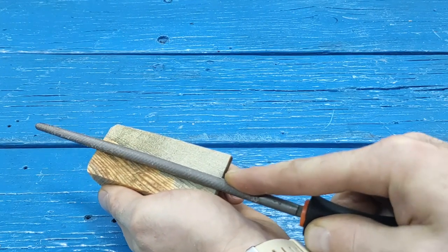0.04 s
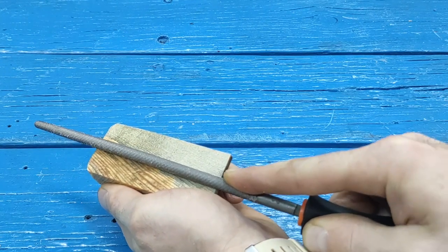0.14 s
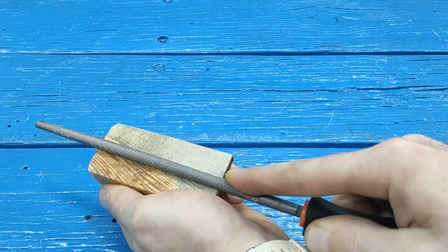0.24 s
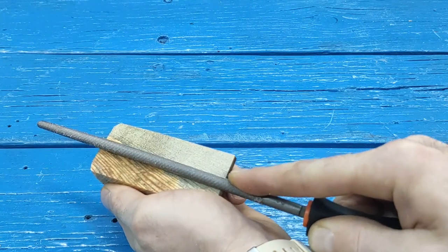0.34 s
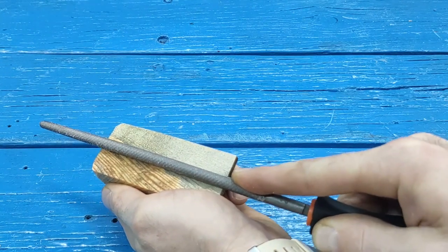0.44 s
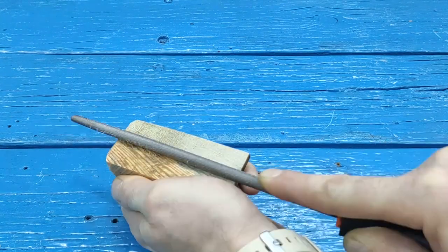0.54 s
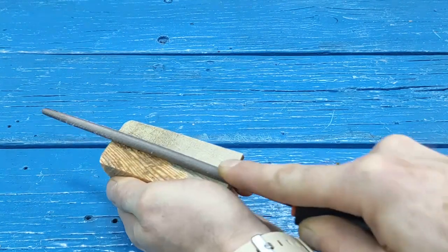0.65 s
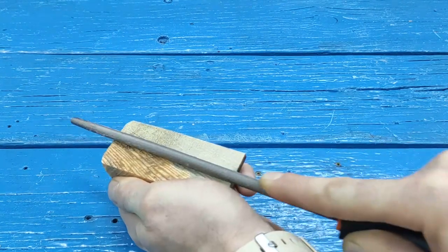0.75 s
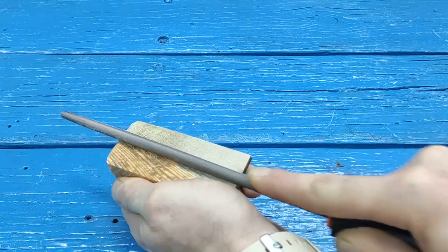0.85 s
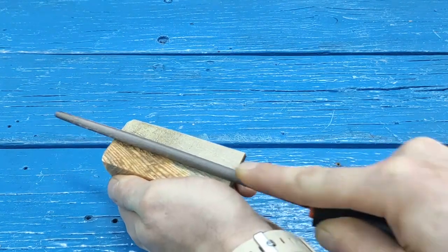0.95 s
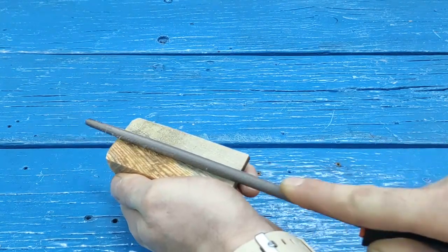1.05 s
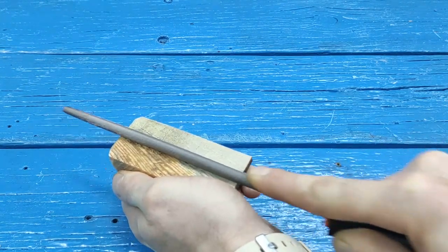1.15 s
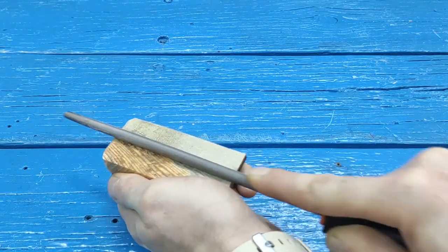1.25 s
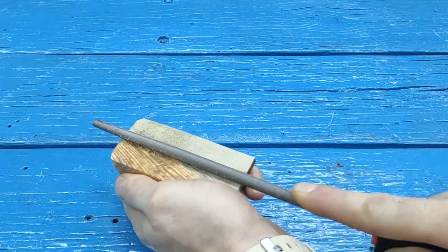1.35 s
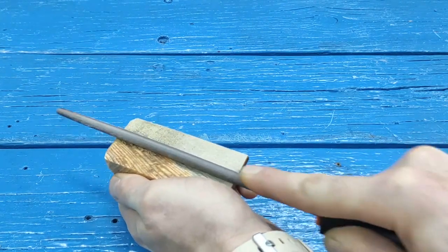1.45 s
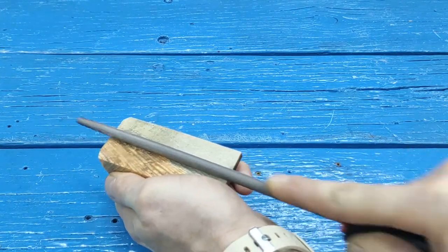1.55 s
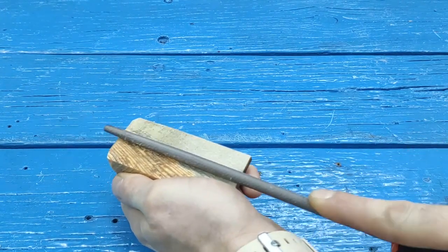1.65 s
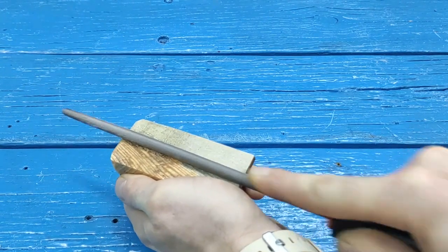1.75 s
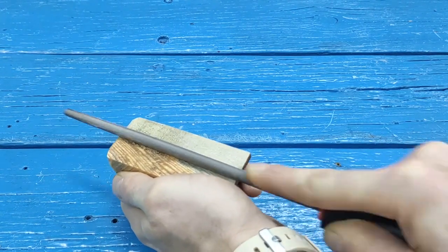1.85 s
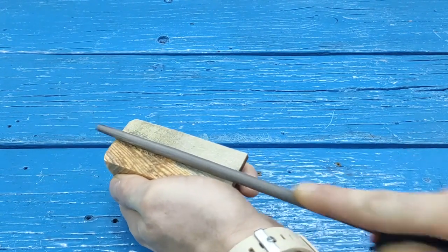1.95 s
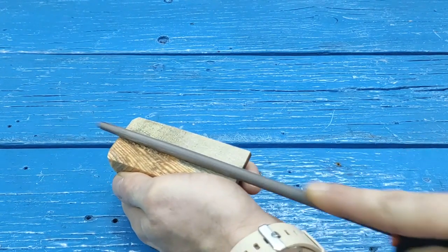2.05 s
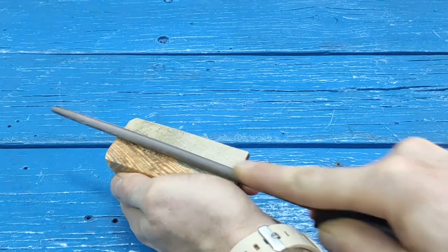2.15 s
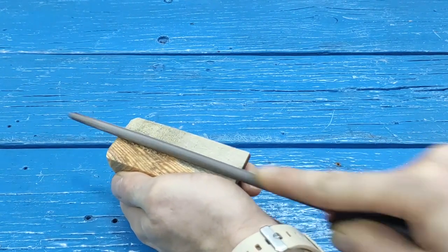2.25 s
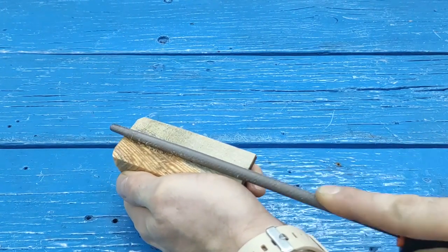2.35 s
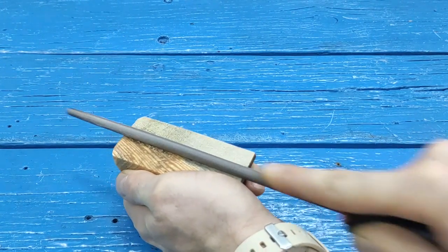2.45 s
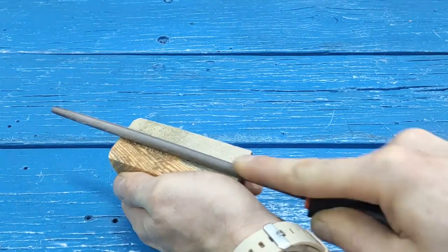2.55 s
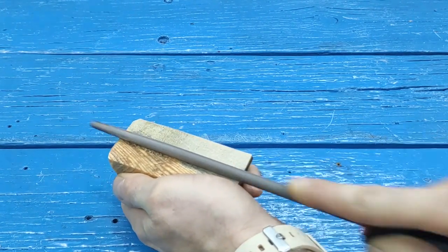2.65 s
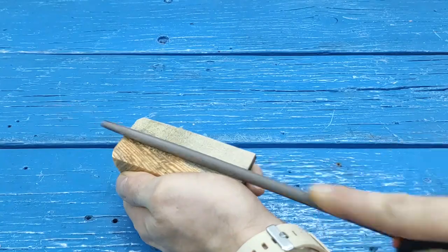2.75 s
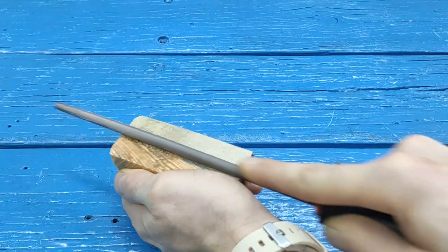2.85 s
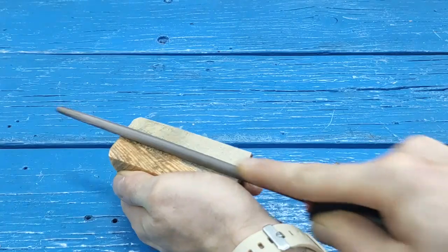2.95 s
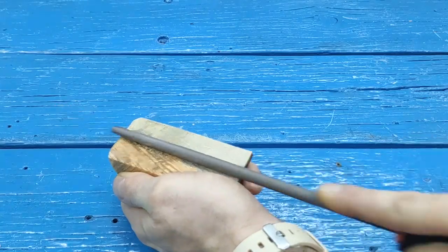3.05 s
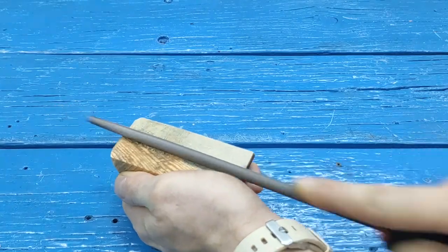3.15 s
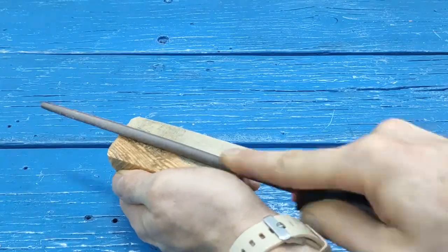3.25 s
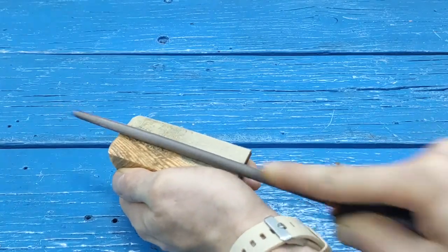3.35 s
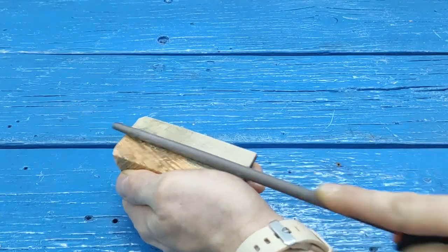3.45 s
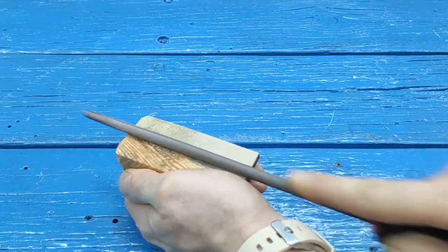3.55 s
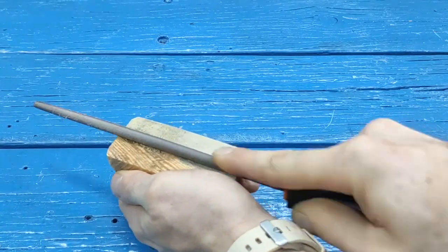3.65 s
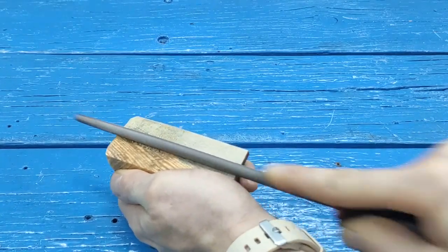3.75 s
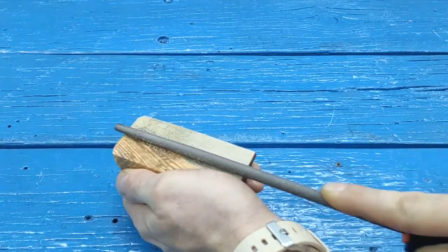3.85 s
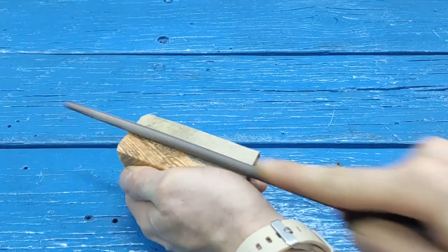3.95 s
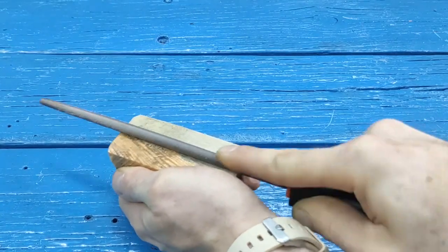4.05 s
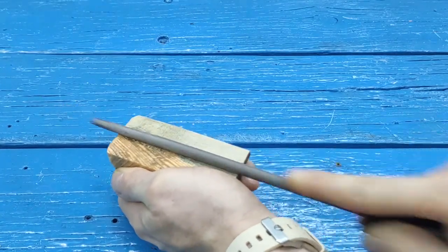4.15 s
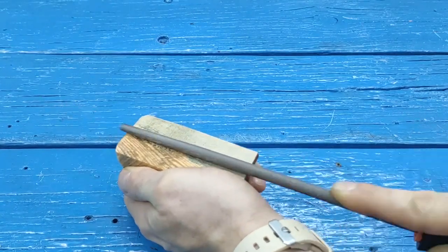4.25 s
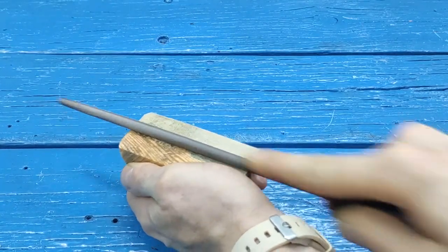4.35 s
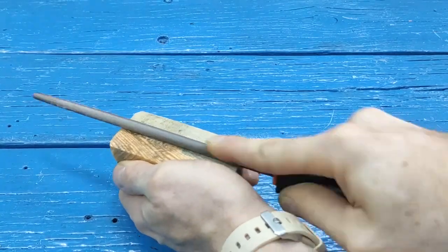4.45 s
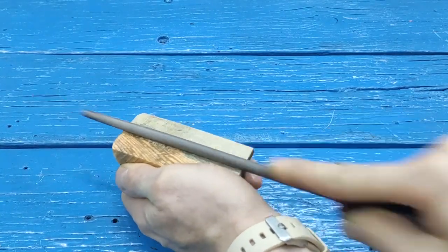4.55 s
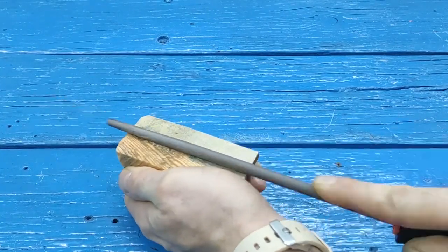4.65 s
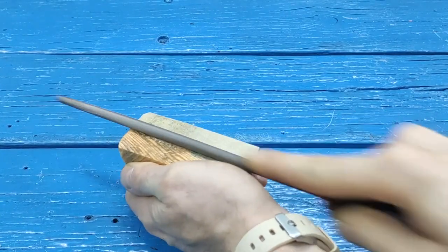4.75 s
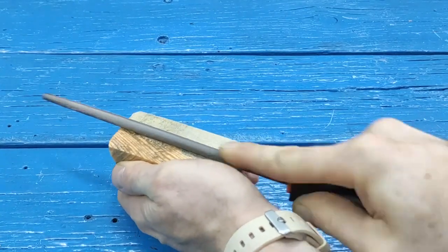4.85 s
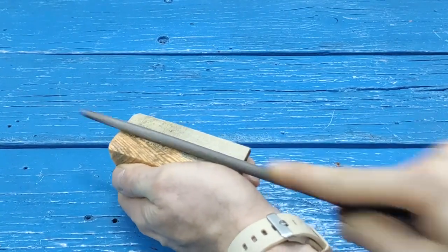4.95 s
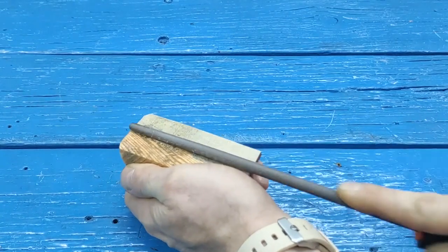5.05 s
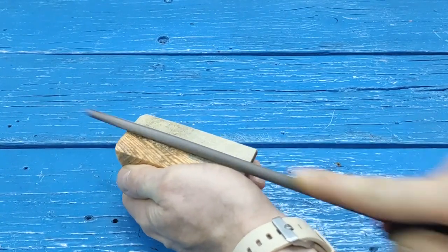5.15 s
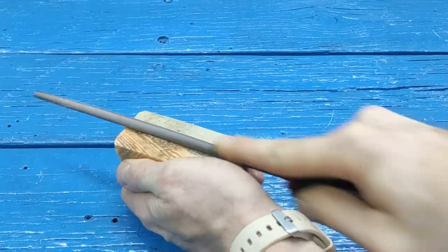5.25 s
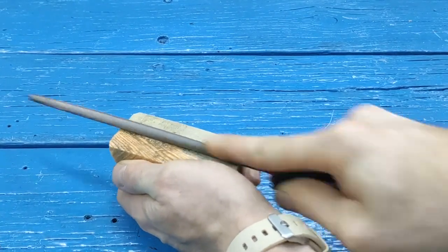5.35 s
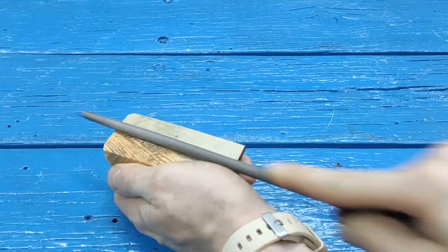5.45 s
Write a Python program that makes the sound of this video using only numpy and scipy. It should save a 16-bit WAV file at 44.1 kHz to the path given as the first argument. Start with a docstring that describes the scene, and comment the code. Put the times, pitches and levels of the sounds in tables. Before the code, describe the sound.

After a quiet half second with a soft knock, a round file rasps wood in fast, steady to-and-fro strokes that grow steadily louder.

```python
"""First a slip, a soft knock and a tick, over a very quiet room; then a round file rasps a hand-held wooden block.
It works the end grain about seven times to and fro a second, at first ever harder.
Its teeth tear fibres in a crackle that follows the speed; on some strokes they bite evenly and sing a short arch.
Turns of the hand give low thuds, the block creaks in the grip, and a small workshop answers."""
import sys
import numpy as np
from scipy import signal
from scipy.fft import rfft, irfft, next_fast_len
from scipy.io import wavfile
from scipy.ndimage import uniform_filter1d, map_coordinates

SR = 44100
rng = np.random.default_rng(int(sys.argv[2]) if len(sys.argv) > 2 else 0)


def to_wav(s):
    """Save 16-bit WAV."""
    ch = np.atleast_2d(s).T  # columns
    pcm = np.round(np.clip(ch, -1, 1) * 32767)  # PCM
    wavfile.write(sys.argv[1], SR, pcm.astype(np.int16))


N = 242991

# Spectra, relative density: freq_hz, density_db
# quiet room
AIR_SPECTRUM = [(25, 18.5), (150, 5.5), (300, 5), (600, -4), (1200, -7), (2500, -4), (5000, -9.5),
                (8000, 0), (15000, -5)]
# slide of the file onto the wood
SLIP_SPECTRUM = [(880, -90), (1500, -56), (3300, -33.5), (5450, -21.5), (6140, -28), (6570, -14),
                 (9470, -27.5), (11400, -32), (13600, -31), (14000, -22), (15800, -18)]
# hands on the block
RUMBLE_SPECTRUM = [(15, 4), (35, 0), (60, 0.5), (110, -6.5), (180, -11), (300, -23.5), (600, -42),
                   (2000, -83)]
# creak of the block
BLOCK_SPECTRUM = [(80, -4), (160, -0.5), (285, 0), (340, -3), (420, -5), (550, -4), (750, -3.5), (1080, 2),
                  (1400, 3), (2500, -25), (6000, -41)]
# cutting push
PUSH_SPECTRUM = [(100, -28), (450, -23), (900, -22.5), (1600, -12.5), (2000, -8), (2500, -1.5), (3800, -1),
                 (5100, -5), (6200, -13), (9800, -14), (11500, -18), (13300, -17.5), (15800, -17.5)]
# dragging pull
PULL_SPECTRUM = [(100, -30), (450, -27.5), (900, -17), (1600, -13), (2000, -2.5), (2500, -1.5), (3800, 0.5),
                 (5100, -2.5), (6200, -14), (9800, -12.5), (11500, -16.5), (13300, -11), (15800, -19)]

# Resonances of file and block: centre_hz, width_hz, lift_db
BODY_MODES = [(2492, 35, 3.5), (3844, 117, 8.5), (4113, 95, 6), (5150, 170, 6), (7675, 600, 9),
              (9890, 450, 3.5), (13440, 850, 7)]
# Decay of the workshop: freq_hz, t60_s
ROOM_DECAY = [(150, 0.15), (700, 0.24), (4000, 0.1), (14000, 0.55)]
# Stereo balance: freq_hz, left_minus_right_db
SIDE_BALANCE = [(40, 6.5), (150, -1), (600, 1.5), (1200, -4.5), (1600, 0), (2400, -3.5), (2800, -2.6),
                (3800, -5), (4400, -0.5), (7700, -4.5), (9500, -3), (11500, -0.5), (13300, 0),
                (15000, -3.5)]
# Stereo width: freq_hz, side_gain_db
SIDE_WIDTH = [(60, 0), (900, 2.5), (1600, 1), (2400, 0), (3200, 4), (3800, 0.5), (5200, 2.5), (6200, 7),
              (7500, -6), (11500, -1.5), (14000, -3)]

# Small contacts of file, block and hand: start_s, level_db, pitch_hz, rise_s, t60_s
CONTACTS = [(0.109, -49.5, 6720, .0004, 0.025), (0.113, -58, 6750, 0.00037, 0.023),
            (0.119, -55, 6600, 0.00042, 0.018), (0.2136, -34, 681, 0.0039, 0.023),
            (.2165, -60, 11600, .0002, .008), (.243, -61, 720, .008, .07),
            (0.473, -58, 11700, 0.000073, .003), (1.614, -47, 140, 0.0052, .1)]
# Cutting pushes, each followed by a lighter pull: fastest_s, level_db
PUSH_STROKES = [(0.688, -47.5), (0.856, -48), (1.017, -46), (1.177, -44.5), (1.331, -43), (1.484, -42.5),
                (1.644, -41.5), (1.785, -40.6), (1.924, -40.5), (2.054, -39.5), (2.197, -39), (2.333, -38),
                (2.476, -37.5), (2.617, -38), (2.751, -37), (2.888, -39), (3.027, -37.5), (3.167, -37.5),
                (3.303, -36.5), (3.438, -37.5), (3.568, -37.5), (3.704, -36), (3.842, -37.5),
                (3.977, -36.5), (4.112, -33), (4.247, -33.5), (4.379, -33.5), (4.516, -34.5), (4.649, -34),
                (4.778, -33.5), (4.911, -33.5), (5.04, -33.5), (5.171, -32), (5.299, -33), (5.421, -33.5)]
# Top tooth rate of the pushes: time_s, tooth_hz
PUSH_TOOTH_RATE = [(.69, 1717), (1.8, 2047), (2.5, 2863), (3.43, 2886), (3.57, 2100), (3.85, 2101),
                   (4.25, 2660), (5.4, 2880)]
# Tooth tone against the scrape: time_s, tone_db
SINGING_LEVEL = [(.6, -32), (2.3, -19.5), (3.05, -17), (3.45, -20), (3.7, -8), (3.88, -13.5), (4.11, -1),
                 (4.25, -4.5), (4.36, -24), (4.95, -8), (5.2, -16)]
# Bending note of the file on the pulls, at full speed: time_s, level_db
CHATTER_LEVEL = [(1, -82), (2, -70), (3, -76), (4.3, -73), (5.1, -63)]

# Stroke timing
FIRST_PULL_S, FIRST_PULL_DB = (0.571, 0.592, 0.655), -55.5  # start, fastest moment, end; level
RETURN_SHARES = (.25, .475, 0.73)  # turn, fastest pull, next turn: shares of the push-to-push time
HURRY_PER_DB = 0.0043  # all three come earlier by this share per dB of effort
TOUCH_DB_PER_S = 1100  # rise as the file eases onto the wood

# Levels that follow effort: dB at usual effort, dB more per dB of effort
USUAL_PUSH_DB = -38  # effort is the push level above this
PULL_LEVEL = (-45, 0.67)
TURN_DIP = (20.9, -0.82)  # scrape level lost at the turns
BITE_TREBLE = (1.14, 0.21)
BITE_HOLLOW = (10.1, 0.35)  # scrape lost below the tooth rate
HAND_LEVEL = (-63.5, 0.68)
ROCKING_LEVEL = (-71.5, 0.29)
PULL_TOOTH_HZ, PULL_TOOTH_HZ_PER_DB = 2083, 62.5  # top tooth rate of a pull at usual effort; its rise

GRIP_DB, GRIP_FADE_DB_PER_S = -80, 62  # hands coming to rest before the work
SLIP_S, SLIP_DB, SLIP_RISE_DB_PER_S, SLIP_FALL_DB_PER_S = 0.11, -60.5, 620, 520
SLIP_RING_DB, SLIP_RING_T60_S = -15, .42  # faint ring after the slide, against it
TOP_HZ = 15900


def amp(db):
    """Decibels to gain."""
    return 10 ** (np.asarray(db) / 20)


def unit(x):
    """x at rms 1."""
    return x / np.sqrt(np.mean(x ** 2) + 1e-20)


def along(points, hz):
    """(Hz, value) points read on a log axis."""
    point_hz, values = np.transpose(points)
    return np.interp(np.log(hz + 1), np.log(point_hz + 1), values)


def clock():
    """Time of each sample, s."""
    return np.arange(N) / SR


def curve(rows):
    """(s, value) rows as one value per sample."""
    return np.interp(clock(), *np.transpose(rows))


def wobble(rate_hz):
    """Smooth random curve, rate_hz knots a second."""
    knots = rng.standard_normal(int(N * rate_hz / SR) + 4)
    return map_coordinates(knots, [clock() * rate_hz])


def filtered(x, gain, size=32768):
    """x through the minimum-phase filter of magnitude gain(hz)."""
    magnitude = gain(np.fft.rfftfreq(size, 1 / SR))
    cepstrum = irfft(np.log(np.maximum(magnitude, 1e-6)))
    # fold onto positive time: causal
    cepstrum[1:size // 2] *= 2
    cepstrum[size // 2 + 1:] = 0
    response = irfft(np.exp(rfft(cepstrum)))
    m = next_fast_len(N + size)
    return irfft(rfft(x, m) * rfft(response, m), m)[..., :N]


def coloured(x, spectrum):
    """x given a spectrum, at rms 1."""
    return unit(filtered(x, lambda hz: amp(along(spectrum, hz))))


def repainted(x, colour_db, patchy_db, size):
    """x under a moving colour_db(hz, t), with random patches of gain from the uneven wood; rms 1."""
    overlap = size - size // 4
    hz, t, z = signal.stft(x, SR, nperseg=size, noverlap=overlap)
    patches = uniform_filter1d(rng.standard_normal(z.shape[1:]), size=3, axis=0)
    patches = unit(uniform_filter1d(patches, size=10, axis=1))
    gain = amp(colour_db(hz[:, None] + 1, t) + patchy_db * patches)
    return unit(signal.istft(z * gain, SR, nperseg=size, noverlap=overlap)[1][:, :N])


def effort(s):
    """How hard the arm works at times s, dB above usual."""
    return np.interp(s, *np.transpose(PUSH_STROKES)) - USUAL_PUSH_DB


def driven(rule, s):
    """A dB value that follows the effort at times s."""
    usual_db, growth = rule
    return usual_db + growth * effort(s)


def moments():
    """Times of turn, fastest moment, turn and so on; even strokes are pulls, odd ones pushes."""
    push = np.array(PUSH_STROKES)[:, :1]
    gaps = np.diff(push, axis=0)
    gaps = np.vstack([gaps, [np.median(gaps)]])
    returns = push + gaps * (np.array(RETURN_SHARES) - HURRY_PER_DB * effort(push))
    return np.append(FIRST_PULL_S, np.hstack([push, returns]))


def motion():
    """Per sample: stroke number, and file speed 0-1, nil at each turn."""
    times = moments()
    travel = np.interp(clock(), times, np.arange(len(times)) / 2)
    stroke = np.minimum(travel.astype(int), len(times) // 2 - 1)
    return stroke, np.abs(np.sin(np.pi * travel))


def touching():
    """Gain that opens as the file first meets the wood."""
    return amp(np.minimum(clock() - FIRST_PULL_S[0], 0) * TOUCH_DB_PER_S)


def crackle(per_second, spread_db):
    """Snaps of single fibres, at random moments and of random sizes."""
    snaps = rng.random(N) < per_second / SR
    sizes = amp(spread_db * np.clip(rng.standard_normal(N), -2, 2))
    return unit(snaps * rng.choice([-1, 1], N) * sizes)


def room_air(level_db=-85.5):
    """Steady noise of the quiet room, independent left and right."""
    return amp(level_db) * coloured(rng.standard_normal((2, N)), AIR_SPECTRUM)


def workshop(x, near_db=-9, near_t60_s=0.065, tail_db=-14):
    """Bench and hands scatter the sound at once, differently to each side; walls add a short tail."""
    hz, t, z = signal.stft(rng.standard_normal((2, SR // 2)), SR, nperseg=256)
    decay = amp(-60 * t / along(ROOM_DECAY, hz)[:, None])
    tail = signal.istft(z * decay, SR, nperseg=256)[1]
    age_s = np.arange(tail.shape[1]) / SR
    near = rng.standard_normal(tail.shape) * amp(-60 * age_s / near_t60_s) * (age_s > .0005)
    tail = tail * (age_s > .006)
    answer = 0
    for db, part in [(near_db, near), (tail_db, tail)]:
        answer = answer + amp(db) * part / np.linalg.norm(part, axis=1, keepdims=True)
    return signal.fftconvolve(np.atleast_2d(x), answer, axes=1)[:, :N]


def settling():
    """The file slides onto the wood; light contacts each ring one damped tone."""
    before_s = np.maximum(SLIP_S - clock(), 0)
    after_s = np.maximum(clock() - SLIP_S, 0)
    rise = amp(SLIP_DB - SLIP_RISE_DB_PER_S * before_s)
    release = amp(-SLIP_FALL_DB_PER_S * after_s) + amp(SLIP_RING_DB - 60 * after_s / SLIP_RING_T60_S)
    out = rise * release * coloured(crackle(9000, spread_db=3), SLIP_SPECTRUM)
    for start_s, level_db, pitch_hz, rise_s, t60_s in CONTACTS:
        t = np.maximum(clock() - start_s, 0)
        envelope = amp(level_db - 60 * t / t60_s) * (1 - np.exp(-(t / rise_s) ** 2))
        out += envelope * np.sin(2 * np.pi * pitch_hz * t)
    return out


def thuds(lag_s, thud_hz=34, thud_t60_s=0.11, spread_db=2.1):
    """Just after each turn the block jolts the other way: a damped low tone, rms 1 overall."""
    jolts, t = np.zeros(N), np.arange(SR // 4) / SR
    turns_s = moments()[:-1:2] + lag_s
    sizes = amp(spread_db * rng.standard_normal(len(turns_s)))
    jolts[(turns_s * SR).astype(int)] = (-1) ** np.arange(len(turns_s)) * sizes
    ring = np.sin(2 * np.pi * thud_hz * t) * amp(-60 * t / thud_t60_s)
    return unit(signal.fftconvolve(jolts, ring)[:N])


def hand_rumble(lag_s, reversal_db=7):
    """Uneven low noise of the hands, strongest as they reverse."""
    speed = np.interp(clock() - lag_s, clock(), motion()[1])
    noise = rng.standard_normal(N) + 0.69 * rng.standard_normal((2, N))  # shared, plus each side's own
    return coloured(noise, RUMBLE_SPECTRUM) * amp(3.0 * wobble(25) - reversal_db * (speed - .5))


def handling(thud_db=-4.5, rumble_db=-4, lag_s=0.0091, firm_s=0.75, firm_db_per_s=120):
    """Thuds and rumble fade as the hands come to rest, then grow with a firm grip and effort."""
    working = amp(driven(HAND_LEVEL, clock()) + firm_db_per_s * np.minimum(clock() - firm_s, 0))
    resting = amp(GRIP_DB - GRIP_FADE_DB_PER_S * clock())
    return (working + resting) * (amp(thud_db) * thuds(lag_s) + amp(rumble_db) * hand_rumble(lag_s))


def grumble(turn_db=-3, lumpy_db=3.4, push_db=4, block_hz=282, width_hz=16, ring_db=8,
            shift_db=-88, shift_t60_s=.45):
    """The block shifts once in the grip, then creaks in lumps, more under a push; its lowest mode rings."""
    stroke, speed = motion()
    rub = crackle(3000, spread_db=4) + 0.91 * rng.standard_normal((2, N))
    rub = rub * amp(lumpy_db * wobble(45))

    def wood_db(hz, t):
        return along(BLOCK_SPECTRUM, hz) + ring_db / (1 + ((hz - block_hz) / width_hz) ** 2)

    load_db = turn_db * (.6 - speed) + push_db * speed * (stroke % 2 - .5)
    creak = touching() * amp(driven(ROCKING_LEVEL, clock()) + load_db)
    shift = amp(shift_db - 60 * clock() / shift_t60_s)
    return (creak + shift) * repainted(rub, wood_db, patchy_db=3.5, size=1024)


def chatter(bend_hz=1513, width_hz=55, speed_power=3):
    """On the pulls the dragging file bounces: noise through one bending mode, never twice alike."""
    stroke, speed = motion()
    ring = filtered(rng.standard_normal(N), lambda hz: 1 / (1 + ((hz - bend_hz) / width_hz) ** 2))
    ring = unit(ring * amp(4.0 * wobble(12)))
    return amp(curve(CHATTER_LEVEL)) * (stroke % 2 == 0) * speed ** speed_power * ring


def tearing(spectrum, snap_db, clump_db, apart_db=-3.0):
    """Fibre snaps over a fine scrape, in clumps, ringing in file and block; sides partly independent."""
    def fibres():
        return rng.standard_normal(N) + amp(snap_db) * crackle(2500, spread_db=4.0)

    def colour(hz):
        lift_db = sum(db / (1 + (2 * (hz - centre) / width) ** 2) for centre, width, db in BODY_MODES)
        return amp(along(spectrum, hz) + lift_db)

    force = fibres() + amp(apart_db) * np.array([fibres(), fibres()])
    clumps = amp(clump_db * wobble(600) + 0.36 * wobble(90))
    return unit(filtered(force * clumps, colour))


def toothed(x, tooth_hz, crest_db=3.5, crest_width=0.29, treble_hz=6200):
    """Weak below the tooth-passing rate, strongest at it; a harder bite deepens the hollow, adds treble."""
    def colour_db(hz, t):
        ratio = hz / (np.interp(t, clock(), tooth_hz) + 1)
        crest = crest_db * np.exp(-(np.log(ratio) / crest_width) ** 2)
        hollow = driven(BITE_HOLLOW, t) / (1 + ratio ** 8)
        treble = driven(BITE_TREBLE, t) / (1 + (treble_hz / hz) ** 6)
        return crest - hollow + treble
    return repainted(x, colour_db, patchy_db=3, size=256)


def zing(tooth_hz, jitter=0.0442, flutter_db=3):
    """Evenly biting teeth sound their passing rate: a rough arch of pitch."""
    phase = 2 * np.pi * np.cumsum(tooth_hz * (1 + jitter * wobble(1200))) / SR
    return unit(np.sin(phase) * amp(flutter_db * wobble(350)))


def rasp():
    """Speed sets loudness and tooth rate; the teeth sing only near the top of a stroke."""
    stroke, speed = motion()
    fastest_s = moments()[1::2]
    pushing = np.arange(len(fastest_s)) % 2 == 1
    push_level_db = USUAL_PUSH_DB + effort(fastest_s)
    level_db = np.where(pushing, push_level_db, driven(PULL_LEVEL, fastest_s))
    level_db[0] = FIRST_PULL_DB
    push_hz = np.interp(fastest_s, *np.transpose(PUSH_TOOTH_RATE))
    pull_hz = PULL_TOOTH_HZ + PULL_TOOTH_HZ_PER_DB * effort(fastest_s)
    tooth_hz = np.where(pushing, push_hz, pull_hz)[stroke] * speed
    push = tearing(PUSH_SPECTRUM, snap_db=-5.5, clump_db=0.12)
    pull = tearing(PULL_SPECTRUM, snap_db=-4.5, clump_db=0.8)
    scrape = toothed(np.where(pushing[stroke], push, pull), tooth_hz)
    singing = amp(curve(SINGING_LEVEL)) * speed ** 4
    cut = (scrape + singing * zing(tooth_hz)) / np.hypot(1, singing)  # tone displaces scrape
    dip_db = driven(TURN_DIP, clock()) * (1 - speed)
    return touching() * amp(np.interp(clock(), fastest_s, level_db) - dip_db) * cut


def placed(pair):
    """Each band gets its own stereo width and balance."""
    m = next_fast_len(N + SR // 2)
    hz = np.fft.rfftfreq(m, 1 / SR)
    left, right = rfft(pair, m)
    sides = np.array([[1], [-1]])
    widened = (left + right + sides * (left - right) * amp(along(SIDE_WIDTH, hz))) / 2
    return irfft(widened * amp(sides * along(SIDE_BALANCE, hz) / 2), m)[:, :N]


def scene():
    """Filing, mostly a little to the right, over a very quiet room."""
    taps = settling()
    contacts = taps + workshop(taps, near_db=-12, tail_db=-21.0)
    filing = rasp() + chatter()
    filing = amp(1.39) * (filing + workshop(filing))
    return room_air() + placed(contacts + handling() + grumble() + filing)


def record(dry):
    """Keeps nothing from TOP_HZ up."""
    m = next_fast_len(N + SR // 2)
    return irfft(rfft(dry, m) * (np.fft.rfftfreq(m, 1 / SR) < TOP_HZ), m)[:, :N]


dry = scene()
out = record(dry)
to_wav(out)
```